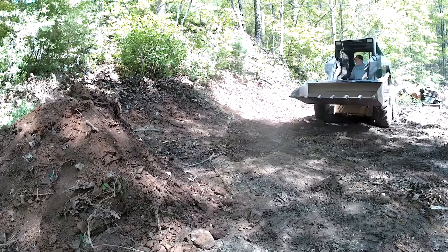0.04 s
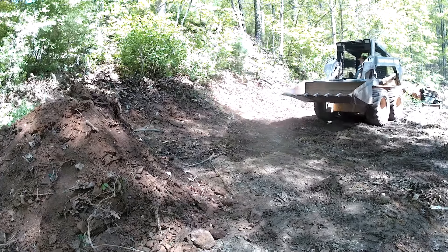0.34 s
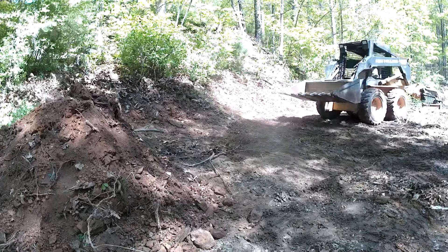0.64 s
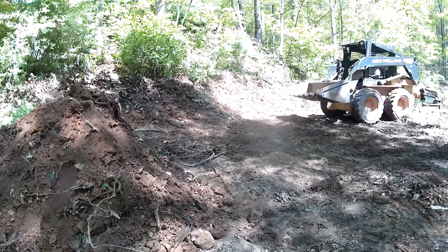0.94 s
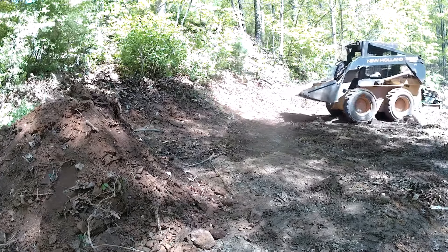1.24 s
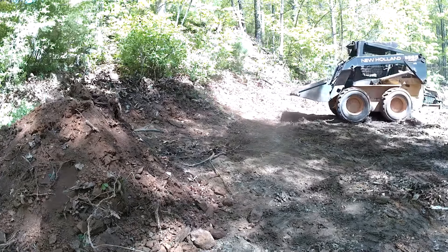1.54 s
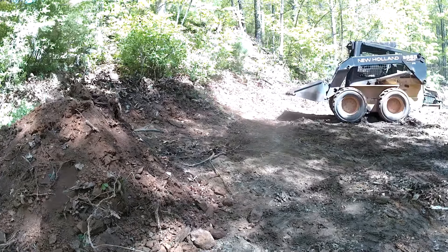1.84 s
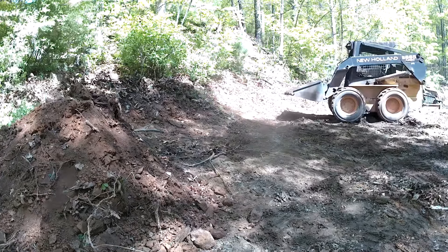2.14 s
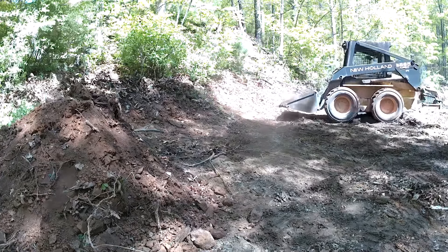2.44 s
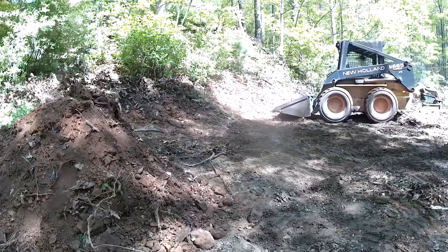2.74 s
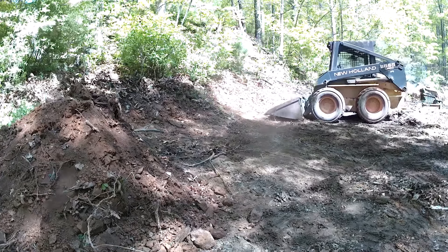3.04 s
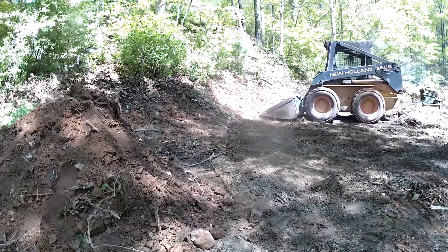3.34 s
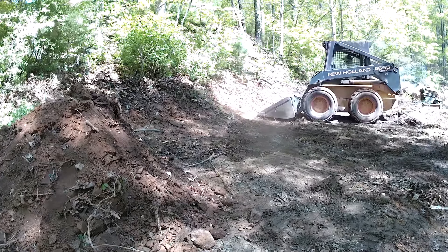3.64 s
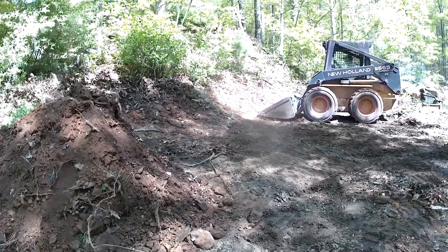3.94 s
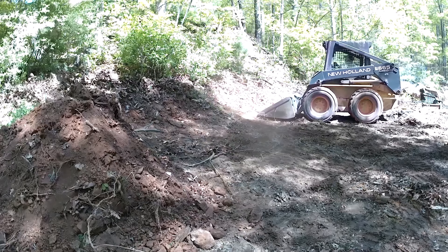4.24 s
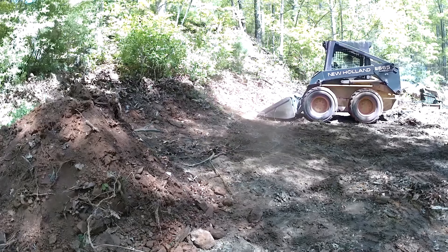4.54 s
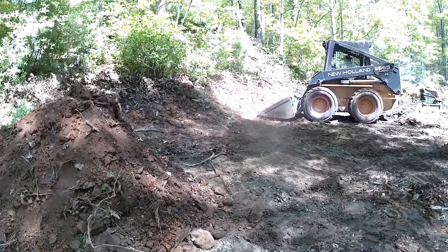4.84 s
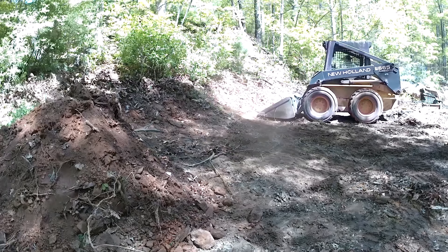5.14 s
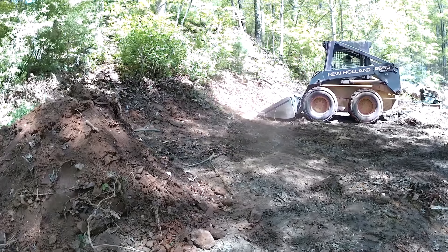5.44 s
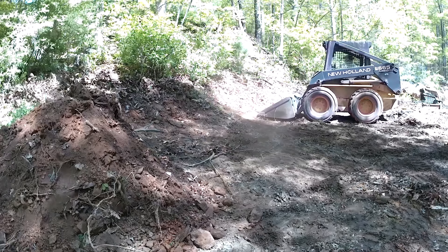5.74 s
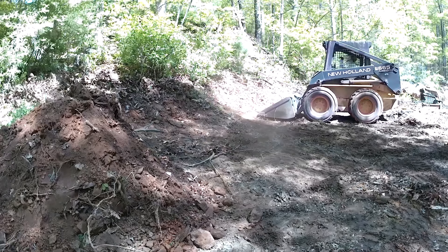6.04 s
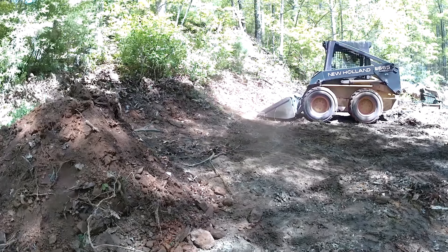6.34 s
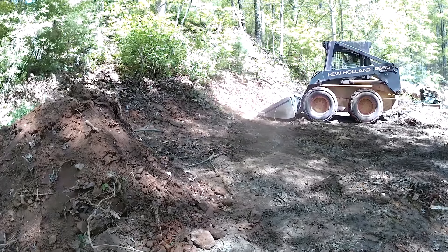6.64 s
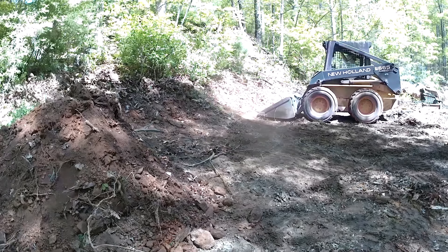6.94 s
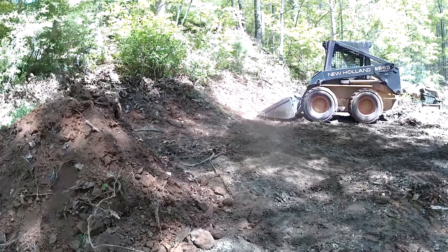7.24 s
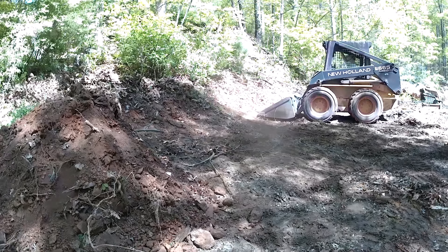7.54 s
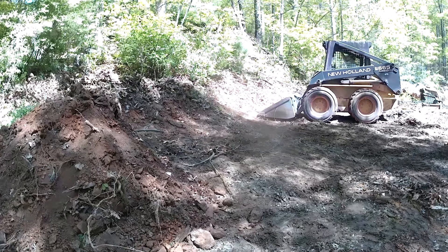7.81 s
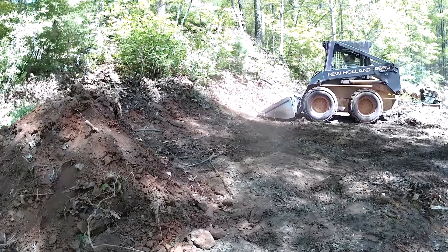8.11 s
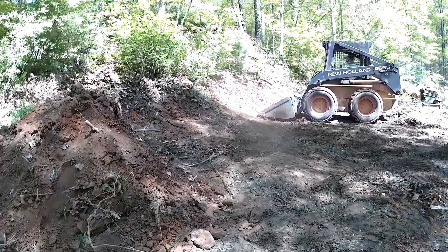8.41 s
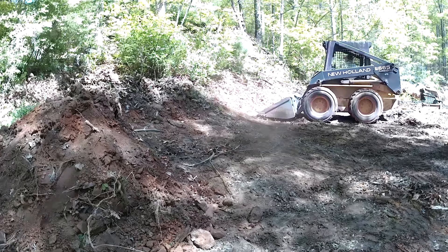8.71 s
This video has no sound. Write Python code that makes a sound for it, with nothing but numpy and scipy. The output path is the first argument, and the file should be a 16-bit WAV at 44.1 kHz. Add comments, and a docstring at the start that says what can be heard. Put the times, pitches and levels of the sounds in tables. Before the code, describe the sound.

A diesel skid steer loader drones with whining hydraulics, clanks, drops to a clattering idle, then shuts off with a few soft chuffs.

```python
"""A hard diesel drone with whining hydraulics: a skid steer turns on a dirt track in the woods.
A pin clinks, the bucket touches down, then the engine drops to idle and is switched off.
Exhaust, cooling fan and pumps all follow one crankshaft; the block clatters in a pattern that repeats
each cycle. With the fuel cut the cylinders chuff ever slower and the engine rocks to rest on its mounts.
"""
import sys
import numpy as np
from scipy import signal
from scipy.fft import rfft, irfft, next_fast_len
from scipy.io import wavfile
from scipy.ndimage import uniform_filter1d

SR = 44100
rng = np.random.default_rng(int(sys.argv[2]) if len(sys.argv) > 2 else 0)


def put_to_file(sound):
    """Save the sound as 16-bit audio at rate SR, in the file named by the first command-line argument."""
    columns = np.atleast_2d(sound).T  # one column per channel
    safe = np.clip(columns, -1, 1)
    whole_steps = np.round(safe * 32767)
    wavfile.write(sys.argv[1], SR, whole_steps.astype(np.int16))


N = 386757
T = np.arange(N) / SR
IDLE_HZ, WORK_HZ = 76, 145  # firing rates at which effort is 0 and 1
THROTTLE_OFF_S, CATCH_S, FUEL_OFF_S, LAST_CHUFF_S, STOP_S = 3.9, 4.55, 7.86, 8.379, 8.48

# the governor holds working speed against a shifting load: t/s, firing rate/Hz
GOVERNED_RATE = [(0, 143.3), (.3, 142), (.8, 141.4), (1, 140.2), (1.2, 142.8), (1.35, 143.9), (1.6, 147),
                 (1.75, 153.8), (1.85, 151.4), (1.97, 151.5), (2.1, 149.6), (2.38, 149.5), (2.5, 152),
                 (2.65, 149.2), (2.75, 152.2), (2.9, 152.6), (3.04, 149.8), (3.25, 149.1), (3.37, 150.3),
                 (3.46, 152.8), (3.7, 151.9), (3.88, 152.6)]
# faders that ride the engine: idle/dB, work/dB, added when coasting/dB, added per octave below idle/dB
EXHAUST_FIRST_FADER = (-45, -30.5, -3, -9.5)
EXHAUST_SECOND_FADER = (-35, -43.5, -8.5, -36.5)
CLATTER_FADER = (-50.3, -40, -1.4, -6.2)
RUMBLE_FADER = (-3.9, -2.7, 3, 2.3)
TOOTH_FADER = (-54, -57.5, 0, -8)
WHINE_FADER = (-55, -57, -7, -29)
FAN_FADER = (-54, -40.5, 0, -28.5)
# tailpipe and engine bay swing round: t/s, exhaust order 1/dB, order 2/dB, clatter/dB, rumble/dB
TURN_GAINS = [(0, -5, 9, -2.5, -2.5), (.8, -0.5, 8.5, -1, -1), (1.3, 0.5, 2, -2, 0.5),
              (1.75, -.5, -12, -.7, 0), (3.5, 1, -14, 0, 0), (4, 1, -1, 1, -1)]
# weak exhaust tones: multiple of the firing rate, work level/dB, idle level/dB
EXHAUST_OVERTONES = [(1.25, -48.5, -67), (1.5, -56, -59), (2.5, -56, -56), (2.75, -51, -59), (3, -51, -57),
                     (4, -59, -59), (5.5, -63.5, -63), (6, -67.5, -57), (7, -61.5, -58.5), (8, -67.5, -64)]
# the cab rings with the throttle shut: f/Hz, width/Hz, boost/dB
CAB_RING = [(348, 75, 13)]
# tone colour of the block and covers, at work and at idle: f/Hz, gain/dB
BLOCK_WORK_EQ = [(30, -21.5), (70, -10.5), (120, -7), (190, -0.5), (240, -5.5), (360, 2.5), (650, -10),
                 (880, -14), (980, -13), (1150, -15), (1400, -11), (1750, -16.5), (2900, -19), (3800, -26),
                 (5300, -33.5), (7300, -48)]
BLOCK_IDLE_EQ = [(30, -14), (100, -7.5), (190, 2.5), (250, -2.5), (320, -3), (400, -2), (600, -9.5),
                 (780, -13.5), (880, -19), (980, -15.5), (1750, -17.5), (2500, -19.5), (3150, -19),
                 (3800, -29), (5200, -33.5), (7300, -48)]
# thin covers shaken by the engine: f/Hz, width/Hz, relative level at work/dB, at idle/dB
COVER_RATTLES = [(987, 49, -16, -16.5), (1510, 50, -24.5, -24.5), (2130, 60, -20.5, -17.5),
                 (2265, 78, -21, -17), (2472, 55, -16.5, -13), (2870, 90, -13.5, -22.5),
                 (3080, 120, -21.5, -18), (5304, 50, -38, -41.5)]
# slow drift in the clatter's deep bass and treble, dullest at the start: t/s, deep bass/dB, treble/dB
CLATTER_TONE = [(0, -1, -6), (.9, -4.5, -2.5), (1.6, 0.5, -3), (2.5, -2, -3.5), (8.77, 3.5, -4.5)]
# the drive pump sings while the wheels turn: t/s, level/dB of piston harmonics 1, 2, 3, 4
PISTON_LEVELS = [(0, -56.5, -39.5, -51, -60), (.17, -50, -43, -50, -61), (.3, -45, -52, -53, -62),
                 (.5, -42.5, -54, -52, -61), (.64, -42, -57, -47, -59), (.8, -44, -56, -52, -48.5),
                 (.95, -48, -52, -60, -63), (1.1, -51, -51, -48.5, -52), (1.3, -48.5, -59, -47.5, -62),
                 (1.45, -52, -47, -59, -66), (1.7, -58, -56, -61, -66), (2.15, -55, -52, -54, -65.5),
                 (2.45, -53, -57, -62, -65), (2.9, -57, -57, -54, -65), (3.3, -55, -57, -65, -70),
                 (3.9, -66, -58, -66, -75)]
# the levers load the gear pump: start/s, end/s, tooth tone boost/dB, harmonics boost/dB
LEVER_LOADS = [(0.22, .56, 15, 6.5), (.56, .9, 15.5, 1), (.9, 1.25, 9, 1), (1.25, 1.62, 7, 11.5),
               (1.73, 1.98, 11, 3), (2.46, 2.66, 13, 2), (2.66, 2.86, 17, 1), (2.86, 3.44, 10.5, 1),
               (3.44, 3.92, 19.5, 4.5), (3.92, 4.12, 7, 1)]
# resonances of the pump housing: f/Hz, width/Hz, boost/dB
HOUSING_PEAKS = [(375, 39, 10), (533, 42, 18)]
# gear whine: multiple of the tooth rate, relative level/dB
GEAR_HARMONICS = [(2, -2), (3, -11), (4, -14)]
# hum of the six-blade fan: multiple of the shaft rate, relative level/dB
FAN_HARMONICS = [(1, -15.5), (3, -5.5), (6, -1), (9, -21.5)]
# the fan grille swings past as the machine turns: t/s, gain/dB
GRILLE_GAIN = [(0, -1), (.8, 1), (1.05, 4.5), (1.38, 3.5), (1.6, -8), (1.75, 1.5), (4, 0.5), (5, 2.5)]

# a loose arm pin clinks. Hits: t/s, level/dB. Ring: f/Hz, relative level/dB, decay/s.
# Contact scrape: low f/Hz, high f/Hz, relative level/dB, decay/s
PIN_HITS = [(2.36, -32)]
PIN_RING = [(2580, 0, .012), (2705, -4, 0.026), (3510, -12.5, .028), (3580, -18, .018), (5060, -22, .03)]
PIN_CONTACT = (1501, 5201, -16, .04)
# the bucket clanks as it touches down: columns as for the pin
BUCKET_HITS = [(3.055, -40.5), (3.067, -34)]
BUCKET_RING = [(2094, -9, .02), (2460, -2, .02), (2620, -4, .008), (2770, 0, 0.01), (3220, -6, .014),
               (4440, -18, .025), (5000, -19, .012), (5308, -14, .02)]
BUCKET_CONTACT = (1200, 3799, -4.5, .013)
# the drive train takes up its slack as the crank stops: columns as for the pin
SLACK_HITS = [(8.342, -55), (8.382, -54), (8.462, -57), (8.543, -60), (8.631, -63), (8.69, -71),
              (8.734, -68)]
SLACK_RING = [(1000, -2, .03), (1300, -5, .016), (1520, -7, .022)]
SLACK_CONTACT = (700, 1900, -5, .026)
# the chassis booms as the machine lurches
CHASSIS_JOLTS = [(1.605, -39, -25.5), (3.02, -27, -38), (3.062, -31, -42), (3.118, -42, -28)]  # t/s, low mode level/dB, high mode level/dB
CHASSIS_RING = [(282, .026), (360, .02)]  # f/Hz, decay/s
# a loose cover ticks at idle
COVER_TICKS = [(4.579, -49, -60), (4.646, -41, -57), (4.74, -46, -60), (4.756, -47, -60), (4.808, -45, -56),
               (4.835, -47, -52), (4.909, -48, -58), (5.061, -46, -47), (5.12, -48, -54), (5.43, -46, -54),
               (5.695, -46, -51), (5.893, -48, -50), (6.031, -43.5, -49), (6.114, -48, -58),
               (6.375, -47, -50), (6.533, -42.5, -54), (6.743, -43.5, -54), (7.53, -49, -48)]  # t/s, high mode level/dB, low mode level/dB
COVER_RING = [(2470, .011), (2160, .009)]  # f/Hz, decay/s
# the stopping engine rocks on its mounts
MOUNT_ROCKS = [(8.197, -33, -37.5), (8.398, -52, -45), (8.444, -37, -62), (8.468, -31, -38.5),
               (8.547, -33, -48), (8.627, -58, -42), (8.641, -32.5, -40), (8.731, -59, -40.5)]  # t/s, low mode level/dB, high mode level/dB
MOUNT_RING = [(190, 0.011), (405, 0.014)]  # f/Hz, decay/s
# tone colour of the forest hush: f/Hz, gain/dB
WOODS_EQ = [(30, 2), (100, 4.5), (200, 3.5), (400, -7), (800, -16), (1500, -19.5), (3000, -29), (5000, -30),
            (7300, -34.5)]


def crank():
    """Firing rate in Hz: governed at work, coasting down, caught just under idle, stopped by friction."""
    work, = curves(GOVERNED_RATE)
    coast = work * decay_after(THROTTLE_OFF_S, decay_s=.85)
    idle = 76.54 - 3.5 * decay_after(CATCH_S, decay_s=.11)
    run_down = np.clip((STOP_S - T) / (STOP_S - FUEL_OFF_S), 0, 1)
    return np.maximum(coast, idle) * run_down ** .87


def exhaust(firings, hz, effort, running):
    """The drone: the muffler leaves two strong orders of the firing rate and a row of weak ones."""
    first_db, second_db, _, _ = curves(TURN_GAINS)
    first_db += fader(EXHAUST_FIRST_FADER, hz, effort)
    second_db += fader(EXHAUST_SECOND_FADER, hz, effort)
    overrun = coasting()
    boom_db = 10 * overrun * effort ** .22  # booms with the throttle shut, less as the crank slows
    out = tone(firings - 1 / 4, first_db + boom_db, waver=.086, locked=True)
    out += tone(2 * firings, second_db + boom_db, waver=.065, locked=True)
    for order, work_db, idle_db in EXHAUST_OVERTONES:
        whole = order % 1 == 0  # whole orders line up in one steep front at each firing
        ring_db = overrun * boost(order * hz, CAB_RING) * whole
        level_db = idle_db + effort * (work_db - idle_db) + ring_db
        out += running * tone(order * firings + 1 / 4, level_db, waver=.26, locked=whole)
    return out


def taps(firings, jitter_s, scatter_db, decay_s):
    """Combustion, injector and valves tap in turn in four cylinders; ground and trees smear each tap."""
    out = np.zeros(N)
    cycles = np.arange(firings[0], firings[-1], 4)
    for k in range(12):
        timing, strength = rng.standard_normal((len(cycles), 2)).T
        times = np.interp(cycles + k / 3, firings, T, right=2 * T[-1]) + jitter_s * timing
        combustion = k % 3 == 0
        sizes = undb(scatter_db * strength + 4.4 * combustion)
        smear = burst(decay_s, length_s=.06) + burst(.02, length_s=.06)
        out += signal.oaconvolve(impulses(times, sizes), smear)[:N]
    return unit(out)


def block(firings, hz, effort):
    """Diesel clatter and the rush of cooling air, coloured by the block and its covers."""
    clatter = taps(firings, jitter_s=.00012, scatter_db=2.1, decay_s=.0046)
    clatter /= np.sqrt(uniform_filter1d(clatter ** 2, SR // 6) + .19)  # evens out the level
    clatter -= band(clatter, 16, 500) / 2  # the light taps carry less bass than the air
    air = rng.standard_normal(N)
    shake = clatter + (.5 + .19 * effort) * air + .36 * band(air, 26, 610)
    out = np.zeros(N)
    for eq, share in ((BLOCK_WORK_EQ, effort), (BLOCK_IDLE_EQ, 1 - effort)):
        body = colour(shake, eq)
        out += share * body / np.std(band(body, 900, 3500))
    _, _, bay_db, rumble_db = curves(TURN_GAINS)
    deep_db, treble_db = curves(CLATTER_TONE)
    # rumble and knocking swell on their own as the load shifts
    rumble_db += fader(RUMBLE_FADER, hz, effort) + .5 + 1.3 * walk(11)
    knock_db = 1.1 * walk(14)
    bands = (30, 77, deep_db), (163, 580, rumble_db), (780, 1700, knock_db), (2640, 20000, treble_db)
    out += sum((undb(db) - 1) * band(out, lo_hz, hi_hz) for lo_hz, hi_hz, db in bands)
    out += cover_rattle(shake, effort)
    out += (undb(-2 * octaves_below_idle(hz)) - 1) * band(out, 1500, 20000)  # duller as it runs down
    level_db = bay_db + fader(CLATTER_FADER, hz, effort) - 1.5 + .5 * walk(12)
    return out * decay_after(STOP_S, decay_s=.06) * undb(level_db)


def cover_rattle(shake, effort):
    """Each thin cover buzzes at its own pitch, in its own fits and starts."""
    out = np.zeros(N)
    for hz, width_hz, work_db, idle_db in COVER_RATTLES:
        level_db = idle_db + effort * (work_db - idle_db) - 4 + 2 * walk(40)
        out += unit(resonance(shake, hz, width_hz)) * undb(level_db)
    return out


def piston_pump(firings, effort):
    """The drive pump's nine pistons sing on the crankshaft, which turns once in two firings."""
    strokes = 9 * firings / 2
    levels_db = [db - 10 * (1 - effort) for db in curves(PISTON_LEVELS)]  # softer unloaded, at idle
    levels_db.append(levels_db[-1] - 4)  # the fifth harmonic follows the fourth
    return sum(tone(k * strokes, db + .8 * walk(6.4), waver=.16) for k, db in enumerate(levels_db, 1))


def gear_pump(firings, hz, effort):
    """Ten teeth whine under the levers' load; their tone swells as it crosses a housing resonance."""
    teeth, tooth_hz = 10 * firings / 2, 10 * hz / 2
    tooth_db = fader(TOOTH_FADER, hz, effort) + boost(tooth_hz, HOUSING_PEAKS)
    whine_db = fader(WHINE_FADER, hz, effort)
    for start_s, end_s, tooth_boost_db, whine_boost_db in LEVER_LOADS:
        valve = gate(start_s, end_s, ramp_s=.082)
        tooth_db += valve * tooth_boost_db
        whine_db += valve * whine_boost_db
    out = tone(teeth, tooth_db, waver=.1, locked=True)
    for k, db in GEAR_HARMONICS:
        unloaded_db = -7 * (k - 2) * (1 - effort)  # the top harmonics die away without load
        out += tone(k * teeth, whine_db + db + unloaded_db, waver=.15)
    return out


def fan(hz, effort):
    """Six uneven blades hum, on a belt that slips a little more at speed."""
    shaft_turns = np.cumsum(hz * (.6123 - .0088 * effort)) / SR
    grille_db, = curves(GRILLE_GAIN)
    level_db = grille_db + fader(FAN_FADER, hz, effort)
    return sum(tone(k * shaft_turns, level_db + db, waver=.14) for k, db in FAN_HARMONICS)


def chuffs(firings, hz, pipe_hz, width_s, loudest_rate_hz):
    """Without fuel each cylinder still pushes one soft puff through the ringing muffler."""
    unfired = np.arange(0, np.interp(FUEL_OFF_S, T, firings), -1)
    times = np.interp(unfired, firings, T)
    octaves_off = np.abs(np.log2(np.maximum(np.interp(times, T, hz), 1) / loudest_rate_hz))
    fade_in = np.minimum((times - FUEL_OFF_S) / .07, 1)  # the firing gives way
    sizes = undb(-25.2 - 7 * octaves_off) * fade_in
    t = T[:SR // 20] - 1 / 40
    puff = np.cos(2 * np.pi * pipe_hz * t + .27) * np.exp(-np.abs(t / width_s) ** 1.35)
    puffs = signal.oaconvolve(impulses(times, sizes), puff, "same")
    return puffs + undb(-3) * resonance(puffs, hz=183, width_hz=32)


def clank(hits, modes, scrape):
    """Metal on metal: each blow scrapes briefly and rings the modes of the part."""
    times, hit_db = np.transpose(hits)
    clicks = impulses(times, undb(hit_db))
    t = T[:SR // 4]
    ring = sum(undb(db) * np.sin(2 * np.pi * hz * t) * np.exp(-t / decay_s) for hz, db, decay_s in modes)
    lo_hz, hi_hz, scrape_db, scrape_s = scrape
    contact = signal.oaconvolve(clicks, np.exp(-t / scrape_s))[:N]
    grit = unit(band(rng.standard_normal(N), lo_hz, hi_hz))
    return signal.oaconvolve(clicks, ring)[:N] + undb(scrape_db) * contact * grit


def knocks(hits, modes, rise_s):
    """Blunt blows on one part; each rings its modes in its own proportions."""
    times, *levels_db = np.transpose(hits)
    t = T[:SR // 5]
    out = np.zeros(N)
    for (hz, decay_s), db in zip(modes, levels_db):
        ring = np.sin(2 * np.pi * hz * t) * np.exp(-t / decay_s) * (1 - np.exp(-t / rise_s))
        out += signal.oaconvolve(impulses(times, undb(db)), ring)[:N]
    return out


def loose_parts():
    """Spot hits: arm pin, bucket, drive train slack, chassis, ticking cover and engine mounts."""
    return (clank(PIN_HITS, PIN_RING, PIN_CONTACT)
            + clank(BUCKET_HITS, BUCKET_RING, BUCKET_CONTACT)
            + clank(SLACK_HITS, SLACK_RING, SLACK_CONTACT)
            + knocks(CHASSIS_JOLTS, CHASSIS_RING, rise_s=.004)
            + knocks(COVER_TICKS, COVER_RING, rise_s=.0008)
            + knocks(MOUNT_ROCKS, MOUNT_RING, rise_s=.0026))


def tree_scatter(blows):
    """The trees scatter each blow into a short, soft tail."""
    return undb(-14) * signal.oaconvolve(blows, burst(decay_s=.07, length_s=.4))[:N]


def forest_hush():
    """A faint bed of dark noise that slowly breathes."""
    return undb(-54.5 + walk(2.5)) * unit(colour(rng.standard_normal(N), WOODS_EQ))


def fader(part, hz, effort):
    """Gain in dB of one part of the machine, from the state of the engine."""
    idle_db, work_db, coast_db, octave_db = part
    steady_db = idle_db + effort * (work_db - idle_db)
    return steady_db + coast_db * coasting() + octave_db * octaves_below_idle(hz)


def coasting():
    """1 from the closing of the throttle until the governor catches the crank."""
    return gate(THROTTLE_OFF_S, CATCH_S, ramp_s=.036)


def octaves_below_idle(hz):
    """How far the crank has fallen below idle speed, up to a limit."""
    return -np.log2(np.clip(hz / IDLE_HZ, .31, 1))


def boost(tone_hz, peaks):
    """Rise in dB of a gliding tone as it passes through resonances."""
    return sum(db * np.exp(-((tone_hz - hz) / width_hz) ** 2) for hz, width_hz, db in peaks)


def tone(turns, db, waver, locked=False):
    """A sine near an rms level, wavering in strength and phase; a locked one peaks near whole turns."""
    sway = 1 + waver * (walk(14) + 1j * walk(14))
    start = 0 if locked else rng.random()
    return np.sqrt(2) * undb(db) * np.real(sway * np.exp(2j * np.pi * (turns + start)))


def impulses(times, sizes):
    """A train of single clicks."""
    at = np.round(times * SR).astype(int)
    inside = (at >= 0) & (at < N - 1)
    return np.bincount(at[inside], sizes[inside], N)


def burst(decay_s, length_s):
    """Noise that dies away, with unit energy."""
    t = T[:int(length_s * SR)]
    noise = rng.standard_normal(len(t)) * np.exp(-t / decay_s)
    return noise / np.linalg.norm(noise)


def walk(rate_hz):
    """Smooth random wander with a spread near 1."""
    hold = int(SR / rate_hz)
    steps = np.repeat(rng.standard_normal(N // hold + 1), hold)
    return 1.3 * uniform_filter1d(uniform_filter1d(steps, hold), hold)[:N]


def gate(start_s, end_s, ramp_s):
    """1 between two times, with sloping edges."""
    return np.clip(np.minimum(T - start_s, end_s - T) / ramp_s + .5, 0, 1)


def decay_after(start_s, decay_s):
    """Hold at 1, then die away."""
    return np.exp(-np.maximum(T - start_s, 0) / decay_s)


def curves(table):
    """Each column of a time table, sample by sample."""
    times, *columns = np.transpose(table)
    return [np.interp(T, times, column) for column in columns]


def colour(x, eq):
    """Filter by an EQ curve of f/Hz, gain/dB."""
    hz, db = np.transpose(eq)
    size = next_fast_len(N + 8192)
    bin_hz = np.maximum(np.arange(size // 2 + 1) * SR / size, 1)
    gain = undb(np.interp(np.log(bin_hz), np.log(hz), db))
    return irfft(rfft(x, size) * gain, size)[:N]


def resonance(x, hz, width_hz):
    """One ringing mode."""
    return signal.lfilter(*signal.iirpeak(hz, hz / width_hz, fs=SR), x)


def band(x, lo_hz, hi_hz):
    """Band-pass without delay."""
    return signal.sosfiltfilt(signal.butter(2, [lo_hz, hi_hz], "band", fs=SR, output="sos"), x)


def unit(x):
    """Scale to rms 1."""
    return x / np.sqrt(np.mean(x ** 2))


def undb(db):
    """Decibels to gain."""
    return 10 ** (np.asarray(db) / 20)


def scene():
    """The machine among trees that scatter its blows, over a faint forest hush."""
    hz = crank()
    effort = np.clip((hz - IDLE_HZ) / (WORK_HZ - IDLE_HZ), 0, 1)
    running = np.clip(hz / IDLE_HZ, 0, 1) ** 3
    stumble = .055 * effort * (1 - effort) * walk(45)  # the crank coasts unevenly from work to idle
    firings = np.cumsum(hz * (1 + .001 * walk(20) + stumble)) / SR
    firings -= np.interp(LAST_CHUFF_S, T, firings)  # counted from the last puff
    blows = chuffs(firings, hz, pipe_hz=138, width_s=.0048, loudest_rate_hz=38.3) + loose_parts()
    woods = tree_scatter(blows) + forest_hush()
    machine = exhaust(firings, hz, effort, running) + fan(hz, effort)
    machine += running * piston_pump(firings, effort) + gear_pump(firings, hz, effort)
    machine += block(firings, hz, effort)
    return (machine + blows + woods)[None]


def record(dry):
    """A steep high cut takes off the top of the treble."""
    return signal.sosfilt(signal.ellip(10, .2, 80, 7500, fs=SR, output="sos"), dry)


dry = scene()
out = record(dry)
put_to_file(out)
```